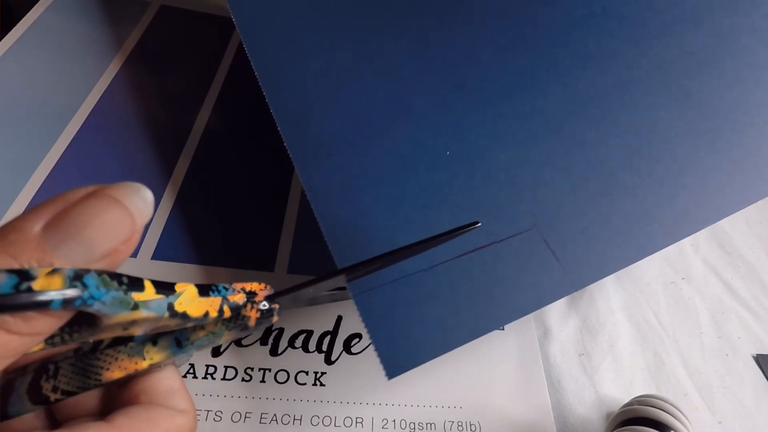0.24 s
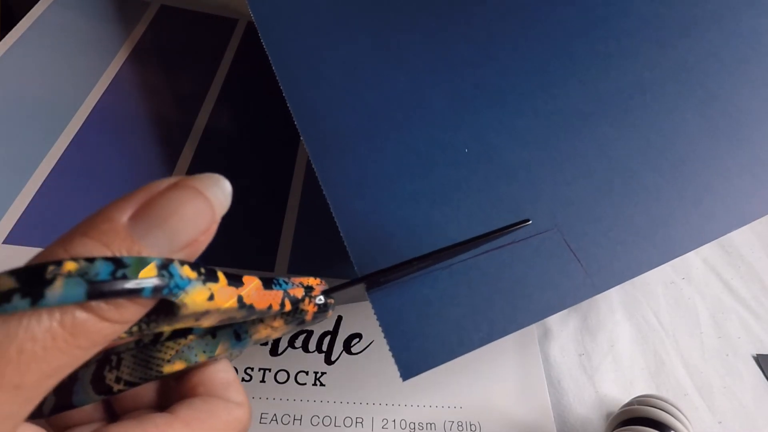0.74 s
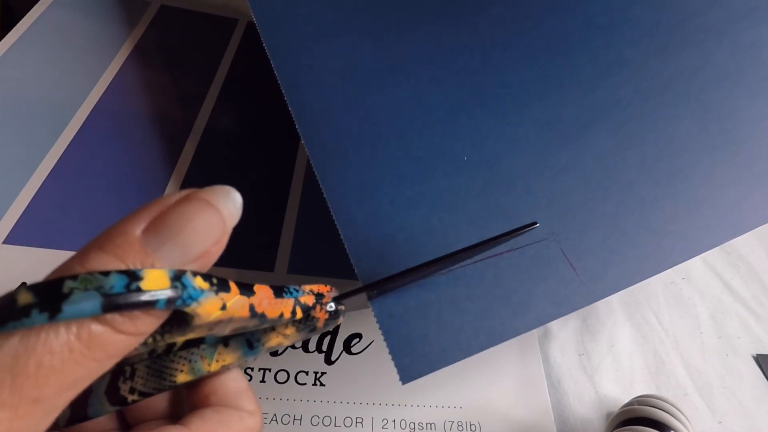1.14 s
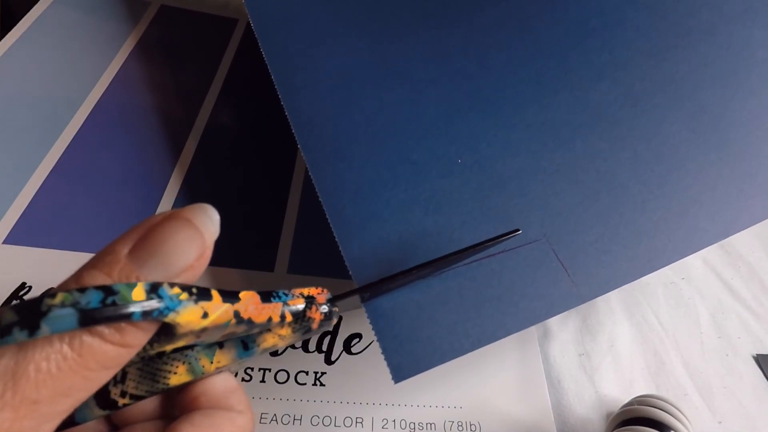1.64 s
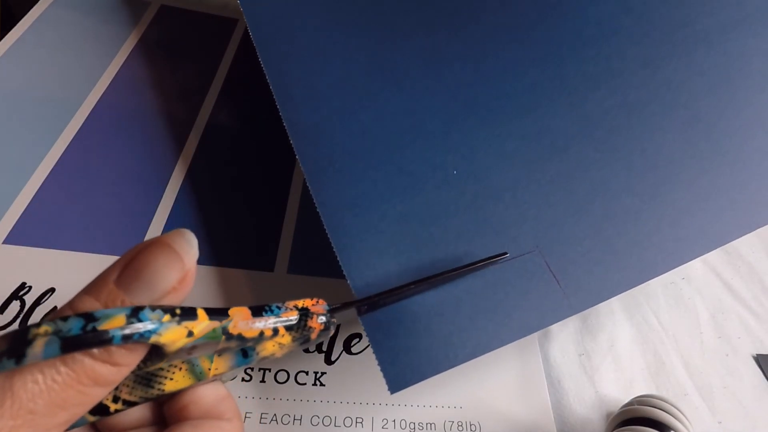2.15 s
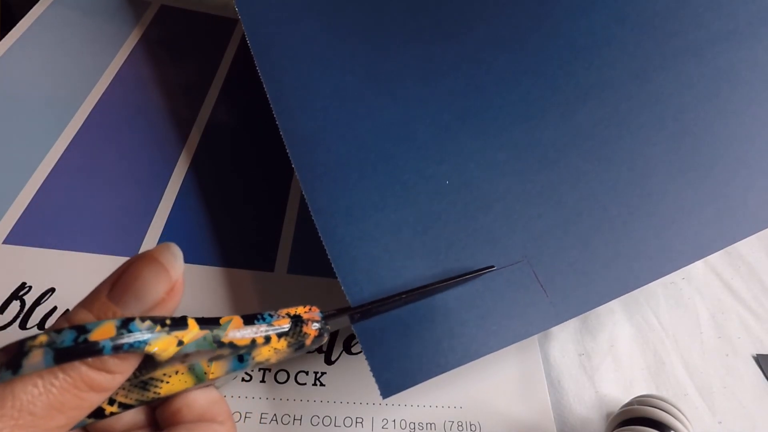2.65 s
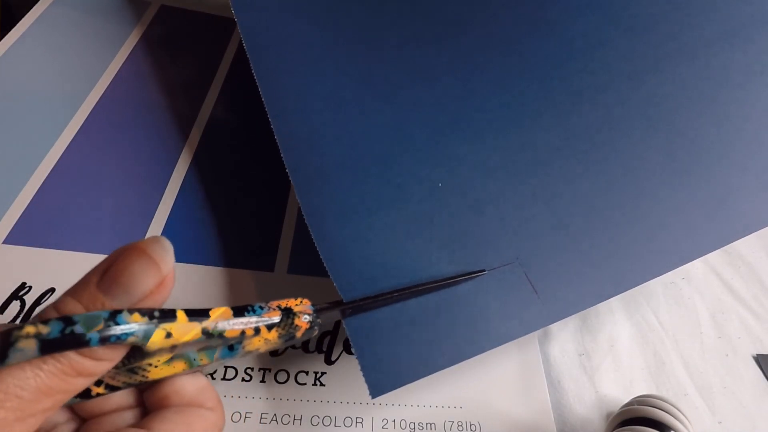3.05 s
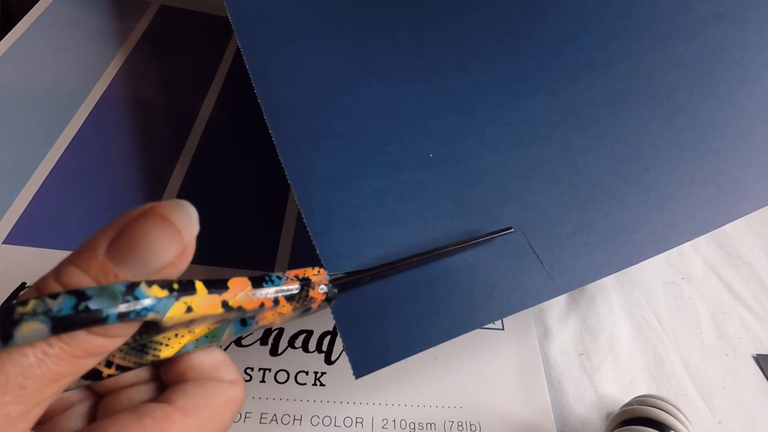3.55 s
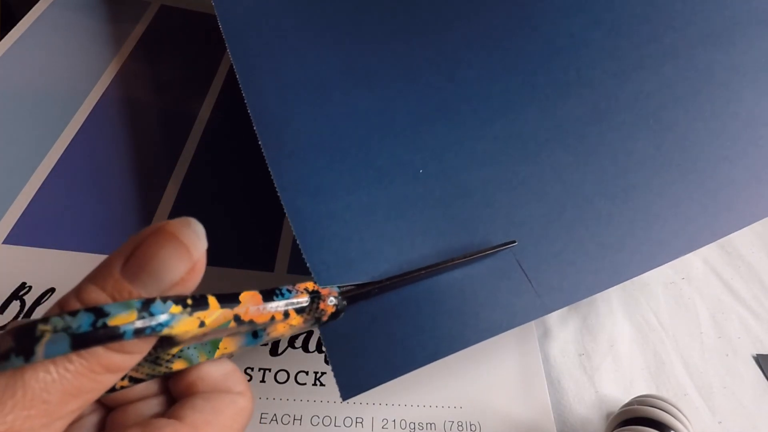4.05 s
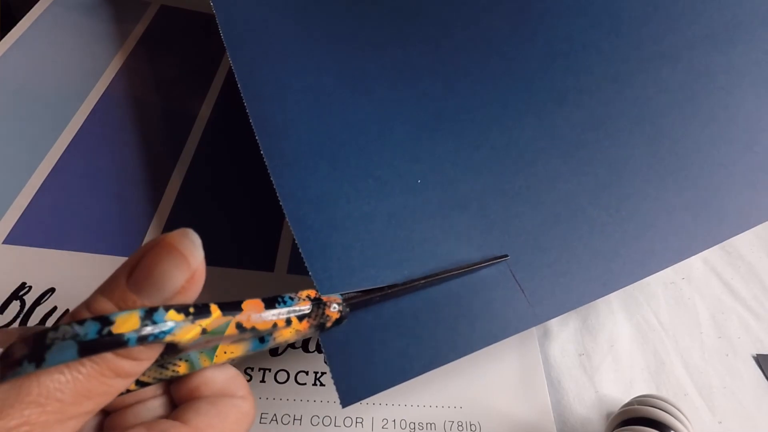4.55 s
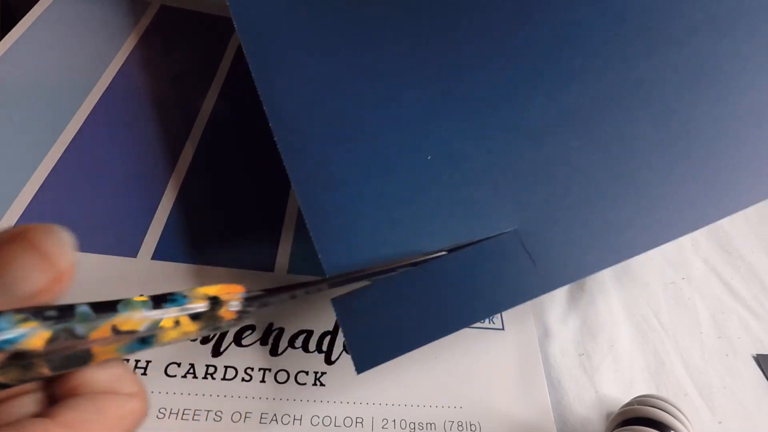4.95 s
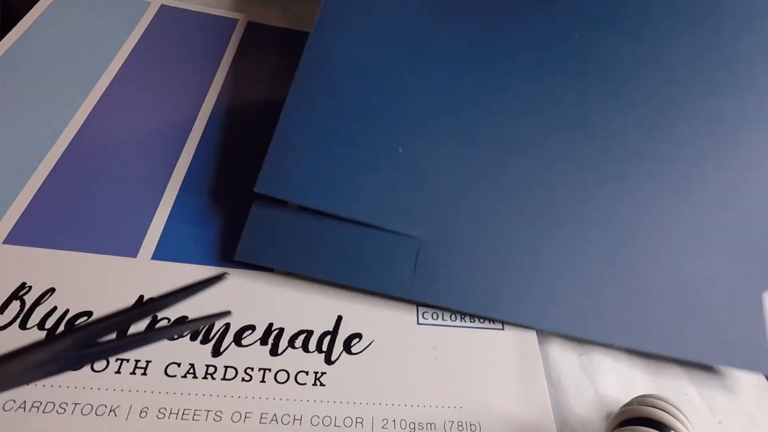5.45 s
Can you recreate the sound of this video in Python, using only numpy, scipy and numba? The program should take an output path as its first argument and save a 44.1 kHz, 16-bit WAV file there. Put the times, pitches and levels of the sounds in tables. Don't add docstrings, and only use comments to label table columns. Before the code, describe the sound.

Scissors crunch slowly through stiff card, stutter, then finish with a sharp snip; the freed sheet slides and scuffs in a quiet room.

```python
import sys
import numpy as np
from scipy import signal
from scipy.fft import rfft, irfft, next_fast_len
from scipy.io import wavfile
from scipy.ndimage import uniform_filter1d, map_coordinates
from numba import njit

SR = 44100
rng = np.random.default_rng(int(sys.argv[2]) if len(sys.argv) > 2 else 0)


def put_to_file(sound):
    columns = np.atleast_2d(sound).T
    safe = np.clip(columns, -1, 1)
    whole_steps = np.round(safe * 32767)
    wavfile.write(sys.argv[1], SR, whole_steps.astype(np.int16))


def how_loud(loudness_db):
    steps = np.asarray(loudness_db, float) / 20
    return 10 ** steps


N = 251525
T_S = np.arange(N) / SR

# (frequency [Hz], width [Hz], level [dB])
LOOSE_FLAP = [(420, 70, 0)]
LOOSE_FROM_S = 4.712


def unit(x):
    return x / np.sqrt(np.mean(x ** 2))


@njit
def svf(x, hz, width_hz):
    y, band, low = np.empty(len(x)), 0., 0.
    g, k = np.tan(np.pi * hz / SR), width_hz / hz
    for i in range(len(x)):
        v = (band + g * (x[i] - low)) / (1 + g * (g + k))
        band, low, y[i] = 2 * v - band, low + 2 * g * v, k * v
    return y


@njit
def glide(x, hz, width_hz):
    y, band, low = np.empty(len(x)), 0., 0.
    for i in range(len(x)):
        g, k = np.tan(np.pi * hz[i] / SR), width_hz / hz[i]
        v = (band + g * (x[i] - low)) / (1 + g * (g + k))
        band, low, y[i] = 2 * v - band, low + 2 * g * v, k * v
    return y


def noise_rms(width_hz):
    return np.sqrt(np.pi * width_hz / SR)


def body(x, modes):
    power = sum((how_loud(db) * noise_rms(width_hz)) ** 2 for hz, width_hz, db in modes)
    out = 0
    for k, (hz, width_hz, db) in enumerate(modes):
        out = out + (-1) ** k * how_loud(db) * svf(x, float(hz), float(width_hz))
    return out / np.sqrt(power)


def grains(rate_hz, spread_db):
    hit = rng.random(N) < rate_hz / SR
    return unit(hit * rng.standard_normal(N) * how_loud(spread_db * rng.exponential(size=N)))


def walk(rate_hz):
    return unit(map_coordinates(rng.standard_normal(4096), [np.arange(N) * rate_hz / SR], order=3))


def curve(rows, outside_db=-120):
    s, db = np.transpose(list(rows))
    return np.interp(T_S, s, db, left=outside_db, right=outside_db)


def bursts(rows, rise_ms, fall_ms, swell=0.):
    out, ms = np.zeros((len(rows[0]) - 2, N + 4096)), np.arange(4096) * 1000 / SR
    for s, db, *rel_db, length_ms in rows:
        rise = np.minimum(ms / (rise_ms + swell * length_ms), 1)
        fall = np.exp(-np.maximum(ms - length_ms + fall_ms, 0) / fall_ms)
        i = int(s * SR)
        out[:, i:i + 4096] += how_loud(db + np.array([0, *rel_db]))[:, None] * rise * fall
    return out[:, :N]


def cutting():
    # (time [s], sheet level [dB], length [ms])
    slow_tears = [(1.22, -49, 7.6), (1.372, -39.5, 11.7), (1.403, -51, 18), (1.432, -39.5, 9.9),
                  (1.447, -54, 5.8), (1.469, -42, 14), (1.49, -55, 10), (1.506, -37, 12), (1.519, -43, 9),
                  (1.555, -44, 21), (1.587, -40.5, 16), (1.61, -43, 14.5), (1.638, -43, 11),
                  (1.672, -45, 16), (1.693, -48, 21), (1.727, -37.5, 29.6), (1.754, -53, 10),
                  (1.782, -37.5, 18), (1.8, -36.5, 19), (1.821, -36.5, 10.4), (1.836, -39, 7.2),
                  (1.862, -40, 9.5), (1.886, -53, 4.6), (1.902, -39.5, 5.2), (1.948, -39.5, 8.9),
                  (1.984, -40, 16), (2.008, -38, 15), (2.027, -36.5, 23), (2.056, -37.5, 10),
                  (2.075, -30, 7)]
    # (time [s], sheet level [dB], length [ms], extra crack level [dB])
    sticky_tears = [(2.111, -51, 13, 4), (2.141, -48, 19, 5), (2.177, -34.5, 5.7, -9), (2.21, -38, 9, -6),
                    (2.232, -34, 5.4, -1), (2.257, -35.5, 8.4, -1), (2.276, -42, 13, 3),
                    (2.301, -45.5, 34, 5), (2.372, -44, 4.4, 2), (2.3805, -30, 5.1, 3), (2.415, -41, 8, 9),
                    (2.423, -37, 9.3, 4.5), (2.432, -30, 6.8, 3), (2.448, -34.5, 13, 5.5),
                    (2.476, -27, 7.2, -1), (2.491, -31.5, 9.7, -2), (2.53, -32.5, 4.5, 0),
                    (2.539, -37.5, 8, 0), (2.544, -37.5, 6, 2), (2.566, -43, 5.5, 0),
                    (2.57, -32.5, 7.3, -4.5)]
    jerky_tears = [(2.682, -33, 2.7, 9.5), (2.711, -26, 7.8, 0), (2.722, -40, 10, -3),
                   (2.736, -37.5, 7.3, 5), (2.766, -30, 11, -1), (2.777, -30, 3.5, 3),
                   (2.793, -24.5, 7, -8), (2.799, -23.5, 7.1, 0), (2.808, -29.5, 21.3, 5),
                   (2.821, -39, 21, 3), (2.837, -36.5, 16, 1), (2.9509, -34, 5, 4.5), (2.96, -31, 2.4, 7.5),
                   (2.966, -47.5, 20, -5), (3.055, -37, 3.6, -10), (3.061, -39, 2.9, -10),
                   (3.077, -39, 6.9, -6), (3.094, -36, 17, 6), (3.111, -35, 13, -3), (3.13, -24, 4, 7.5),
                   (3.137, -31, 5.3, -10), (3.144, -31.5, 13, -12), (3.157, -36.5, 18.4, 4),
                   (3.179, -46, 10, 11.5), (3.249, -46, 80, -5), (3.316, -31.5, 4.4, 16.5),
                   (3.321, -25, 12, -7), (3.33, -34, 10, -8), (3.345, -36.5, 13, -16),
                   (3.382, -41, 6.5, -18), (3.396, -52, 8.3, -20), (3.426, -45, 6.8, -15)]
    snip_tears = [(4.165, -51.5, 9.4, 5), (4.29, -42.5, 4.5, -6), (4.398, -35, 5.2, -4),
                  (4.483, -31.5, 9.9, 5.5), (4.496, -32.5, 10, -1), (4.5095, -21.5, 10, -3),
                  (4.521, -27, 11, 3), (4.533, -35, 8.7, 4), (4.543, -22.5, 8, -2), (4.556, -29.5, 19, 0.5),
                  (4.573, -21.5, 14, -2.5), (4.589, -22, 12, -4), (4.609, -29, 11.2, 2),
                  (4.643, -22, 7.8, -2.5), (4.665, -25.5, 13.5, 4.5), (4.686, -24, 9.6, 1.5),
                  (4.694, -28, 11, 1), (4.706, -16.5, 6.8, 0), (4.715, -35, 5.1, 0), (4.724, -47, 13, 3),
                  (4.75, -51, 30, -10), (4.834, -52.5, 14, -12)]
    # (run start [s], crack level above sheet [dB],
    # brightening [dB/s], cut edge level above crack [dB])
    brighten = [
        (1.36, -15, 5.5, -7),
        (2.1, -10, -2, -1),
        (2.68, -18.5, 7.5, 12),
        (4.46, -8.5, 12, -2),
    ]
    # (time [s], steady shear level [dB])
    pressure = [
        [(1.36, -56), (1.546, -53), (1.7, -52), (1.9, -46.5), (1.97, -60), (2.08, -48.5), (2.33, -75),
         (2.36, -67.5), (2.6, -55.5)],
        [(2.68, -78), (2.85, -45.5), (2.926, -76), (3.08, -73), (3.188, -43.5), (3.22, -58), (3.362, -48),
         (3.44, -70)],
        [(4.46, -50), (4.612, -48), (4.742, -51), (4.8, -64)],
    ]
    # (frequency [Hz], width [Hz], level [dB])
    fibre = [(2560, 2700, 12), (4300, 1470, 13.5), (6700, 1800, 2), (11700, 8400, -5)]
    mid_crunch = [(2000, 2600, 5), (3030, 1900, 0)]
    cut_edge = [(1510, 233, 0)]
    sheet_lead_ms = 1.3
    held_until_s = 2.4

    rows = []
    runs = [slow_tears, sticky_tears, jerky_tears, snip_tears]
    for tears, (start_s, crack_db, db_per_s, edge_db) in zip(runs, brighten):
        for s, db, length_ms, *extra_db in tears:
            bright_db = crack_db + db_per_s * (s - start_s) + sum(extra_db)
            rows.append((s, db, bright_db, bright_db + edge_db, length_ms))
    low = np.roll(bursts(rows, 0.47, 2.1)[0], -int(sheet_lead_ms * SR / 1000))
    high, edge = bursts(rows, 0.34, 2.17, swell=0.26)[1:]

    patchy = walk(55)
    shear = sum(how_loud(curve(p)) for p in pressure) * how_loud(2.2 * patchy)
    stutter = how_loud(1.6 * walk(240))
    tone = sheet(grains(6000, 0.95) * (shear * how_loud(7.0) + low * how_loud(3.5)) * stutter)
    flap = body(tone * (T_S > LOOSE_FROM_S), LOOSE_FLAP) * how_loud(-6.0)

    held = T_S < held_until_s
    gripped = (T_S > 4.44) & (T_S < 4.7)
    held_tone = svf(tone * held, 780.0, 550.0) * how_loud(2.0)
    gripped_tone = svf(tone * gripped, 950.0, 940.0) * how_loud(0.5)
    tone = held_tone + gripped_tone + tone * ~(held | gripped)
    taut = signal.sosfilt(signal.butter(5, 600, "high", fs=SR, output="sos"), tone)
    is_taut = ((T_S > 2.4) & (T_S < 2.83)) | gripped
    tone = np.where(is_taut, taut * how_loud(0.93), tone)

    snap = grains(9000, 1.3) * stutter
    crack = snap * (shear * how_loud(-14.0) + high * how_loud(-5.0))
    crunch = body(snap * (shear + np.roll(low, 30)) * how_loud(-23.5) * held, mid_crunch)
    bright = dull(body(crack, fibre) * how_loud(-2.0) + blades(crack, patchy[::-1]))
    return tone + flap + crunch + bright + body(snap * edge * how_loud(-5.5), cut_edge)


def sheet(x):
    # (frequency [Hz], width [Hz], level [dB])
    bending_modes = [(395, 390, -13), (635.6, 235, -2), (764, 193, -0.5), (1117, 434, -4),
                     (1359, 655, -7.5)]
    return 1.216 * svf(body(x, bending_modes), 560.0, 1200.0)


def blades(x, drift):
    # (time [s], first [Hz], second [Hz], third [Hz], second level above first [dB])
    blade_rings = [(1.4, 3870, 5260, 8200, -8), (2.05, 4020, 5450, 8060, -3), (2.2, 4020, 5450, 8130, -3),
                   (2.5, 4170, 5600, 8400, -7.5), (2.8, 4360, 5870, 8700, 4), (3.15, 3900, 5460, 7900, -3),
                   (4.5, 4300, 5460, 8100, -13), (4.63, 4020, 5340, 8100, 1), (4.645, 4000, 5200, 6860, -9)]
    width_hz, third_width_hz = 380.0, 480.0
    s, *cols = np.transpose(blade_rings)
    first_hz, second_hz, third_hz, second_db = (np.interp(T_S, s, c) for c in cols)
    waver = 1 + 0.022 * drift
    rings = glide(x, first_hz * waver, width_hz)
    rings = rings - how_loud(second_db) * glide(x, second_hz * waver, width_hz)
    rings = rings + how_loud(-8) * glide(x, third_hz * waver, third_width_hz)
    return rings * how_loud(-4.5) / noise_rms(width_hz)


def dull(x):
    top_hz, airy_db = 9400, -6
    low = signal.sosfilt(signal.butter(6, top_hz, fs=SR, output="sos"), x)
    high = signal.sosfilt(signal.butter(4, top_hz, "high", fs=SR, output="sos"), x)
    return low + how_loud(airy_db) * high


def sliding():
    # (time [s], friction level [dB])
    slides = [
        [(0.0, -48.5), (0.018, -68), (0.024, -54), (0.037, -60), (0.042, -68), (0.06, -80)],
        [(3.43, -92), (3.45, -58.5), (3.515, -52), (3.585, -52.5), (3.6, -60), (3.62, -55), (3.66, -52),
         (3.676, -46)],
        [(3.676, -53), (3.685, -46.5), (3.705, -45.5), (3.725, -50.5), (3.746, -58), (3.756, -71)],
        [(3.78, -60), (3.798, -49), (3.868, -48.5), (3.902, -55), (3.917, -70)],
        [(3.965, -66), (3.977, -58), (4.031, -45.5), (4.037, -59)],
        [(4.9, -75), (4.912, -48), (4.916, -48), (4.937, -43.5), (4.945, -33.5), (4.958, -35.5), (4.965, -44.5),
         (5.0, -45.5), (5.066, -52)],
        [(5.066, -54), (5.085, -47), (5.103, -40.5), (5.11, -51), (5.13, -65), (5.17, -75)],
        [(5.19, -69), (5.205, -54), (5.235, -44.5), (5.256, -57), (5.268, -69)],
        [(5.268, -53), (5.29, -46.5), (5.32, -47), (5.35, -44), (5.41, -52.5), (5.43, -57)],
        [(5.43, -59), (5.46, -52.5), (5.54, -51.5), (5.57, -47.5), (5.62, -46), (5.647, -39), (5.652, -56),
         (5.69, -63)],
    ]
    # (sheet level [dB], face hiss level [dB], ring level [dB],
    # ring frequency [Hz], catching [0-1])
    colours = [(4, -6, 0, 3560, .6), (7.5, -2, 2, 3900, 0.45), (2.5, 1, 2.5, 3670, 0.36),
               (-4.5, -5, 2, 3800, 0.2), (4, -3.5, 6, 3760, 0.8), (4, 1, 2, 3540, 0.53),
               (-14, 1.5, 1.5, 3580, 0.8), (-4.5, -6, -5.5, 2900, .6), (-8, -1, -5.5, 3100, 0.3),
               (-12, -2, -5.5, 3030, 0.7)]
    # (frequency [Hz], width [Hz], level [dB])
    face_modes = [(1600, 1440, 1.5), (3600, 1380, 0), (4510, 970, 0), (7530, 2900, -2.5), (8060, 1300, 0),
                  (12400, 4300, -10.5)]
    # (time [s], level [dB], length [ms], pitch [Hz])
    chirp_events = [(3.304, -41, 6.4, 3870), (3.319, -29, 7.8, 2370), (3.319, -35, 6.5, 2780),
                    (3.322, -33, 10, 1500), (4.946, -37, 5.1, 3940), (4.948, -38, 6.9, 3400),
                    (4.612, -38, 9, 4250), (4.522, -44, 10, 4400), (4.667, -37, 7, 3550),
                    (4.717, -38, 6, 2900), (4.975, -44, 14, 2400), (4.708, -29, 2.9, 2450),
                    (3.131, -38, 4, 4150), (4.707, -35, 6, 4000), (4.71, -28, 6, 2700),
                    (3.51, -60, 11, 3900), (3.562, -46, 11, 3880), (3.832, -43, 9.4, 3810),
                    (5.028, -45.5, 22, 3940), (5.343, -39, 12, 3100), (5.365, -53, 6, 3050),
                    (5.48, -50, 6.6, 2500), (5.641, -42, 11, 2850), (5.641, -44, 11, 2250)]
    # (time [s], hum frequency [Hz], level [dB])
    sag_rows = [(3.676, 1080, -60), (3.695, 1020, -41), (3.72, 800, -40), (3.748, 574, -41),
                (3.76, 540, -63)]
    ring_width_hz, sag_width_hz, chirp_width_hz = 380.0, 140.0, 200

    quick, slow = walk(110), walk(28)
    hum, fine, rub = grains(7000, 1.9), grains(15000, 2.14), grains(9000, 1.9)
    hum_gain, face_gain, ring_gain, ring_hz = np.zeros((4, N))
    for rows, (sheet_db, face_db, ring_db, hz, catching) in zip(slides, colours):
        friction_db = curve(rows)
        gain = how_loud(friction_db + catching * (2.2 * quick + 1.0 * slow))
        hum_gain += gain * how_loud(sheet_db)
        face_gain += gain * how_loud(face_db)
        ring_gain += gain ** 0.75 * how_loud(ring_db - 13.5)
        ring_hz += (friction_db > -119) * hz

    hum = hum * hum_gain
    tone = sheet(hum) * how_loud(8.0) + body(hum * (T_S > LOOSE_FROM_S), LOOSE_FLAP) * how_loud(-19.0)
    face = body(fine * face_gain, face_modes) * how_loud(6.5)

    ring_hz = np.clip(ring_hz, 2500, 5000) * (1 + 0.022 * slow[::-1])
    push = rub * ring_gain * how_loud(2.0 * quick[::-1])
    ring = glide(push, ring_hz, ring_width_hz) - how_loud(-6) * svf(push, 4090.0, 660.0)
    ring = ring / noise_rms(ring_width_hz)

    chirps = np.zeros(N)
    for s, db, length_ms, hz in chirp_events:
        gain = bursts([(s, db, length_ms)], 1.4, 2.7)[0]
        chirps += body(fine * gain, [(hz, chirp_width_hz, 0)])

    s, sag_hz, sag_db = np.transpose(sag_rows)
    sag = glide(rub * how_loud(curve(zip(s, sag_db))), np.interp(T_S, s, sag_hz), sag_width_hz)
    return tone + dull(face) + ring + chirps + sag / noise_rms(sag_width_hz)


def scuffs():
    # (time [s], level [dB], low part above it [dB], ring above it [dB], length [ms])
    scuff_events = [(.03, -61, 21, -13, 9.3), (.245, -58, 8, -6, 16), (.665, -60.5, -16, -6, 32),
                    (1.129, -43, -4.5, -5, 11.2), (1.174, -43, -15, 0, 7.8), (3.256, -41, -13, -11, 14),
                    (3.27, -53, 18, -12, 6.8), (3.284, -47.5, 13, -6, 22), (3.3035, -33, 3, -12, 4.6),
                    (3.307, -42.5, 20, -14, 8.3), (4.116, -53.5, 11, -7, 14.6),
                    (4.234, -43, -0.5, -6.5, 7.7), (4.373, -45, 0, -12, 8.6), (5.08, -56, 17, -7, 12),
                    (5.138, -48, 4.5, -3.5, 8.8), (5.176, -40.5, -16, -6.5, 15.5),
                    (5.25, -56, 14, -15, 6.4), (5.268, -66, 0, -15, 4.4), (5.283, -45, 2, -22, 20),
                    (5.516, -53, 11, -17, 13), (5.643, -54, -19, -11, 6.2)]
    # (frequency [Hz], width [Hz], level [dB])
    brush_modes = [(1650, 350, 7.5), (3600, 1540, 5.5), (4640, 650, 8), (7600, 1600, 1), (12100, 7400, -18)]
    high, low, ring = bursts(scuff_events, 0.8, 1.6)
    rough = grains(12000, 0.94)
    brush = body(rough * high, brush_modes) * how_loud(-1.5)
    tick = body(rough * ring, [(3330, 120, 0)])
    return brush + sheet(rough * low) * how_loud(-0.5) + tick


def knocks():
    # (time [s], peak level [dB], pitch
    # [Hz], edge above it [dB], table above it [dB])
    knock_events = [(0.0235, -36, 635, -4, -24), (0.031, -37.5, 910, -12, -22), (2.676, -45, 714, -12, 6),
                    (3.023, -26, 784, -12, -38), (3.1309, -19, 1020, -22, -14), (3.3162, -28, 780, 6.5, 3.5),
                    (3.3187, -27, 1020, 9, -13), (3.3373, -19, 700, -27, -22), (3.3333, -18.5, 580, -27, -7),
                    (3.831, -28.5, 760, -11, -3.5), (3.92, -20, 695, -29, -41), (3.979, -17, 596, -12.5, -41),
                    (4.036, -19.5, 650, -38, -38), (4.395, -49, 730, -8, 9), (4.4665, -36, 690, -5, -31),
                    (4.7058, -17, 890, -1.5, -20), (4.7082, -8.5, 700, 0.5, -17), (4.7173, -18, 810, -12, -32),
                    (4.6425, -24, 750, -14, -32), (4.5755, -20.5, 750, -6, -37), (4.5448, -20, 740, -21, -36),
                    (4.941, -38, 730, -5, -26), (5.084, -27.5, 1180, -23, -28), (2.7097, -21, 760, -29, -40),
                    (2.801, -17, 710, -26, -40), (2.4545, -34, 820, -12, -25), (4.956, -19.5, 790, -5.5, -13.5),
                    (5.176, -37, 706, -18, -0.5), (5.268, -35, 423, -17, -24), (5.282, -31.5, 494, -12, -7.5),
                    (5.522, -54, 666, -9, 15.5), (2.179, -45, 770, -18, -30), (5.533, -45, 270, -37, -13),
                    (5.545, -38, 240, -37, 2), (5.564, -43, 250, -30, 5), (5.693, -30, 350, -12, -5),
                    (2.9505, -26.5, 1060, -9, -35), (2.9605, -27, 810, -16, -38), (3.0435, -43, 800, -12, -35),
             (3.056, -31, 880, -20, -35), (3.0618, -32, 855, -20, -35), (3.0805, -40, 750, -20, -35),
             (4.4875, -30, 1150, -14, -35), (4.5117, -21, 780, -16, -35), (4.667, -24, 1200, -11, -35),
             (4.689, -21, 1000, -12, -35), (2.6811, -34, 1320, -12, -30), (4.9499, -23, 1250, -3, -28),
             (4.9415, -27, 800, -8, -30)]
    out, t = np.zeros(N + 8192), np.arange(8192) / SR
    edge = np.sin(2 * np.pi * 2400 * t) * np.exp(-t / 0.00029) * (1 - np.exp(-t / 0.000044))
    table = np.sin(2 * np.pi * 136 * t) * np.exp(-t / 0.033)
    table = table + 3.33 * np.sin(2 * np.pi * 260 * t) * np.exp(-t / 0.0031)
    for s, db, hz, edge_db, table_db in knock_events:
        ring = -np.sin(2 * np.pi * hz * t) * np.exp(-t / 0.0021)
        knock = 1.2 * ring + 3.0 * how_loud(edge_db) * edge + 0.44 * how_loud(table_db) * table
        i = int((s + 0.00164) * SR)
        out[i:i + 8192] += how_loud(db) * knock
    return out[:N]


def thumps():
    # (time [s], peak level [dB], frequency [Hz], decay [ms])
    jumps = [(0.048, -37, 55, 6.4), (2.712, -37, 29, 16), (3.315, -17, 30.5, 19), (3.849, -26, 22.9, 18),
             (4.038, -21.5, 45, 3.3), (4.713, -32.5, 36, 11.3), (4.956, -35, 36.2, 14)]
    booms = [(2.845, -39, 470, 7), (2.86, -46.5, 353, 6.5), (3.345, -34, 446, 7.9), (3.36, -44, 300, 13),
             (4.712, -31.5, 280, 7), (4.965, -36, 520, 9), (5.005, -39, 454, 7), (5.078, -42, 497, 5.2),
             (5.086, -38, 1130, 6), (5.175, -41, 320, 5.3), (5.28, -44, 304, 6.2), (5.522, -40, 240, 7.6),
             (5.565, -44, 230, 5.2), (5.643, -47, 507, 5)]
    out, ms = np.zeros(N + 8192), np.arange(8192) * 1000 / SR
    for s, db, hz, decay_ms in jumps + booms:
        swing = np.sin(2 * np.pi * hz * ms / 1000)
        i = int(s * SR)
        out[i:i + 8192] -= how_loud(db) * swing * np.exp(1 - ms / decay_ms) * ms / decay_ms
    return out[:N]


def air(near):
    # (time [s], level [dB])
    busy_rows = [(0, -35), (.2, -57), (.85, -60), (1.0, -53.5), (1.65, -31.5), (2.0, -52.5), (2.62, -66),
                 (2.71, -46), (2.98, -49.5), (3.14, -36.5), (3.25, -53), (3.33, -33), (3.45, -40.5),
                 (4.05, -35), (4.2, -48), (4.8, -53), (5.15, -39.5), (5.7, -36.5)]
    sway, flap, rumble = rng.standard_normal((3, N))
    sway = unit(svf(svf(sway, 8.7, 11.7), 8.7, 11.7))
    flap = unit(svf(svf(svf(flap, 25.0, 30.0), 28.0, 31.0), 30.0, 62.0))
    rumble = svf(rumble, 108.7, 43.0) + 0.45 * svf(rumble, 240.0, 285.0) + 0.13 * svf(rumble, 75.0, 43.0)
    busy_db = curve(busy_rows)
    change_db = busy_db - busy_db.mean()
    table_smoothing_s = 0.02
    force = np.abs(uniform_filter1d(near ** 2, int(table_smoothing_s * SR))) ** 0.34
    shake = how_loud(-61.5 + 0.02 * change_db) + how_loud(-24.5) * force
    rumble = unit(rumble) * shake * how_loud(1.4 * walk(25.32) - 1.0)
    return sway * how_loud(-36 + 0.34 * change_db) + flap * how_loud(busy_db - 5.0) + rumble


def hiss():
    # (frequency [Hz], spectral level [dB per Hz])
    spectrum = [(35, -31), (60, -6), (175, -8), (312, -14), (1070, -19.5), (1320, -19.5), (6260, -26),
                (13500, -28), (15500, -29.5)]
    level_db = -57.5
    hz, db = np.transpose(spectrum)
    n = next_fast_len(N)
    f_hz = np.arange(n // 2 + 1) * SR / n + 1
    shape = how_loud(np.interp(np.log(f_hz), np.log(hz), db))
    return unit(irfft(rfft(rng.standard_normal(n)) * shape, n)[:N]) * how_loud(level_db)


def room(near):
    t60_s, level_db = 0.14, -17.5
    t = np.arange(SR // 2) / SR
    echo = svf(rng.standard_normal(len(t)), 560.0, 7800.0) * how_loud(-60 * t / t60_s) * (t > .004)
    return how_loud(level_db) * signal.fftconvolve(near, echo / np.sqrt(np.sum(echo ** 2)))[:N]


def scene():
    near = cutting() + sliding() + scuffs() + knocks()
    return (near + room(near) + thumps() + air(near) + hiss())[None]


def top_cut(x):
    return signal.sosfilt(signal.butter(12, 15680, fs=SR, output="sos"), x)


def record(dry):
    low_pass = signal.ellip(10, .2, 80, 15300, fs=SR, output="sos")
    return top_cut(signal.sosfilt(low_pass, dry))


dry = scene()
out = record(dry)
put_to_file(out)
```